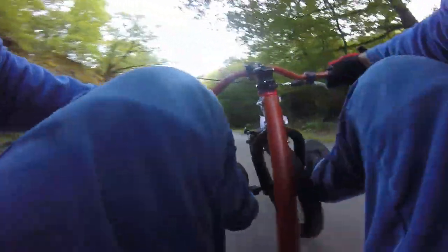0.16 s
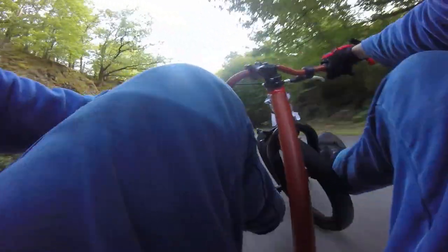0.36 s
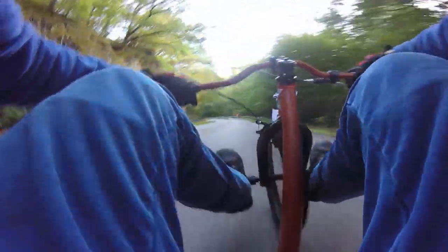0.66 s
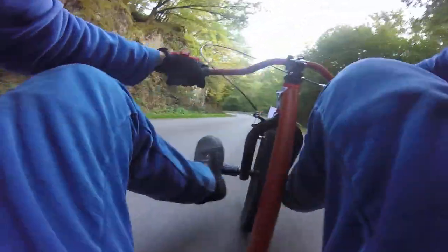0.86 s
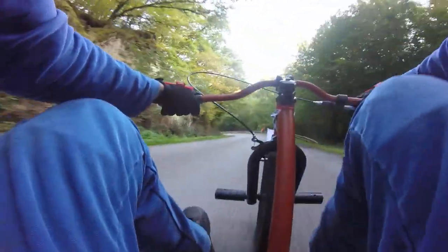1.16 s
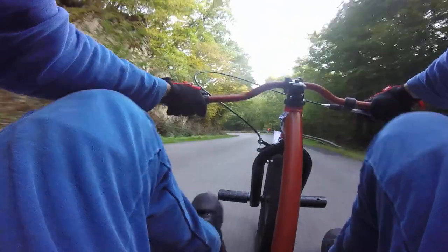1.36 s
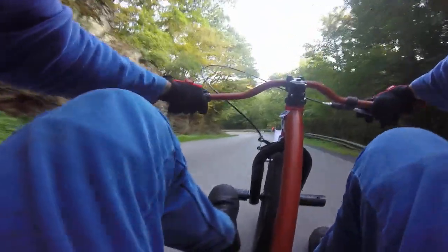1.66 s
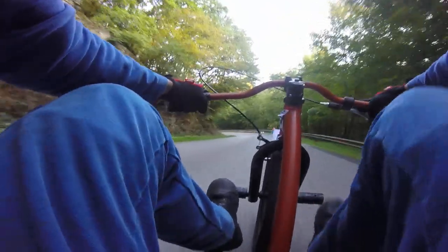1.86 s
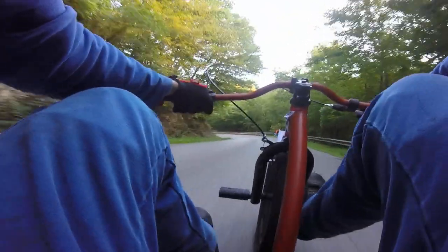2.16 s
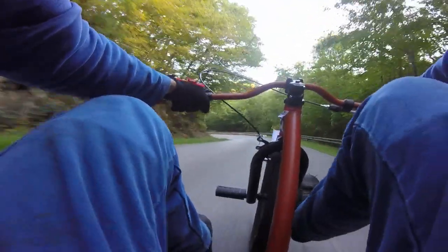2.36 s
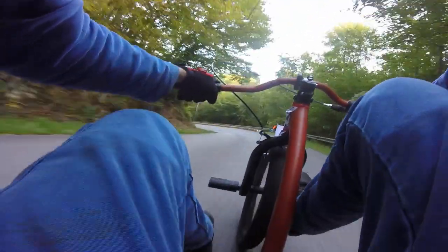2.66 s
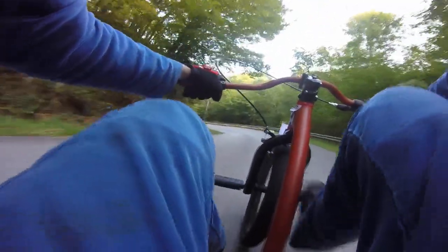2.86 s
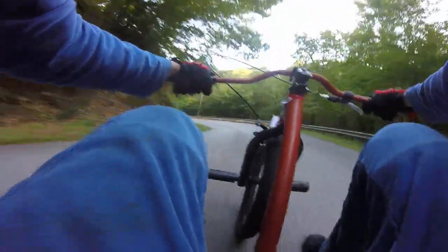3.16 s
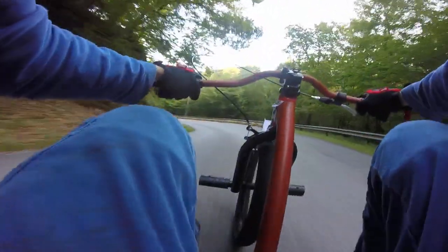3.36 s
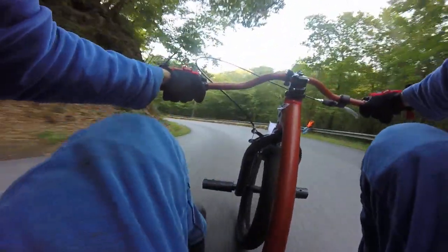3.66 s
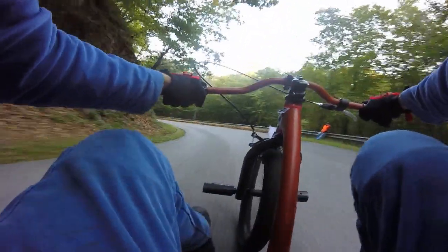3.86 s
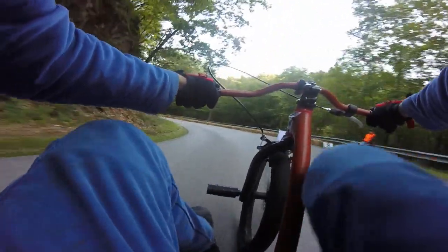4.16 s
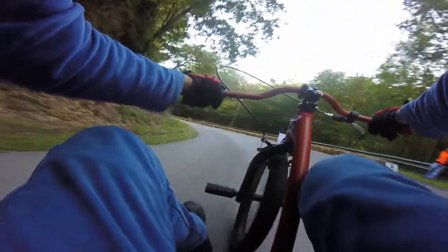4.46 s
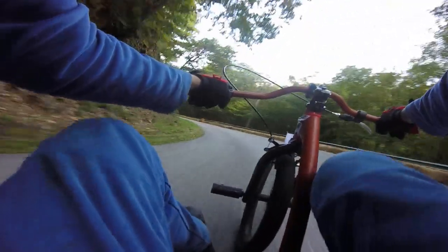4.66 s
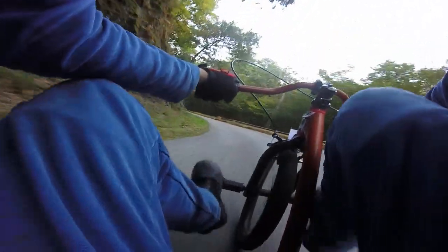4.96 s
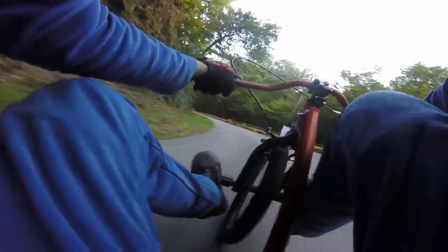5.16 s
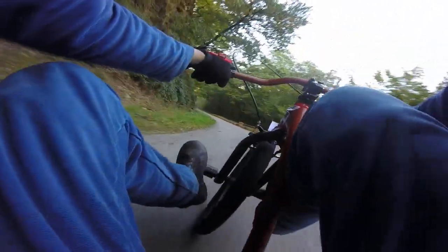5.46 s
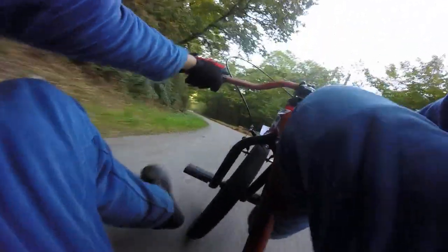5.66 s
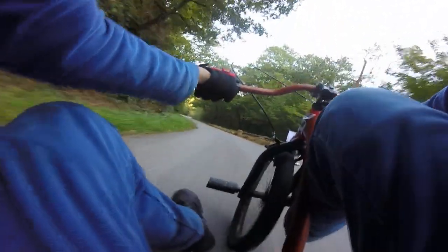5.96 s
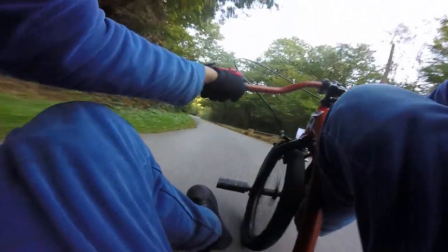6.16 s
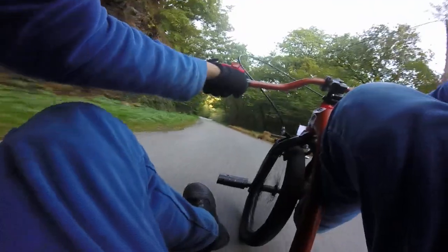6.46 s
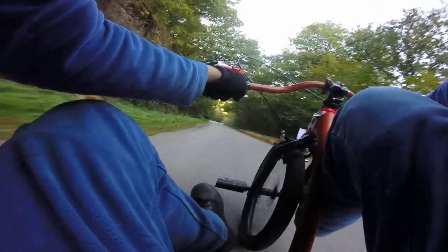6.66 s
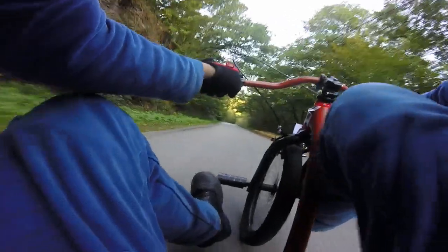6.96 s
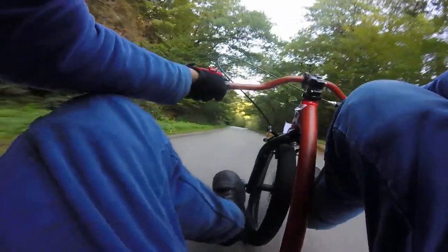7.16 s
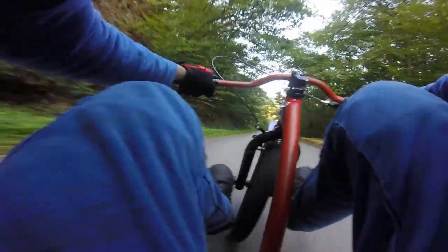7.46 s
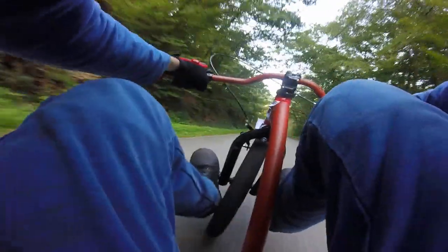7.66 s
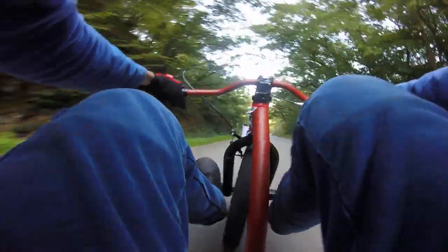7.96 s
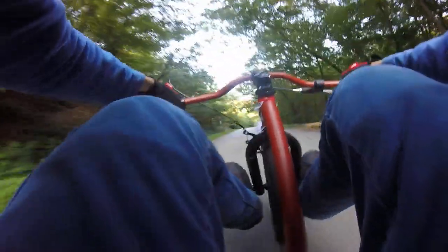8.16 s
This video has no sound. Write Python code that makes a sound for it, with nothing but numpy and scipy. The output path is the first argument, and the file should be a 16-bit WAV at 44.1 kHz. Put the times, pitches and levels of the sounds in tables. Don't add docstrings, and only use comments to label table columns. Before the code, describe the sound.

A low trike speeds down asphalt with a steady, throbbing mid-pitched wheel whine, stones knocking and grit ticking as wind rumbles in the microphone.

```python
import sys
import numpy as np
from scipy import signal
from scipy.fft import rfft, irfft, next_fast_len
from scipy.io import wavfile

SR = 44100
rng = np.random.default_rng(int(sys.argv[2]) if len(sys.argv) > 2 else 0)


def field_ratio(decibels):
    return 10 ** (np.asarray(decibels, dtype=float) / 20)


def put_to_file(sound):
    columns = np.atleast_2d(sound).T
    safe = np.clip(columns, -1, 1)
    whole_steps = np.round(safe * 32767)
    wavfile.write(sys.argv[1], SR, whole_steps.astype(np.int16))


N = 366894
T = np.arange(N) / SR


def evened(x):
    return x / np.sqrt(np.mean(x ** 2) + 1e-20)


def curves(rows):
    s, *columns = np.transpose(rows)
    return [np.interp(T, s, column) for column in columns]


def add(mix, s, sound):
    part = mix[round(s * SR):][:len(sound)]
    part += sound[:len(part)]


def coloured(x, points):
    f, db = np.transpose(points)
    size = next_fast_len(len(x))
    hz = np.fft.rfftfreq(size, 1 / SR)
    gain = field_ratio(np.interp(np.log(hz + 1), np.log(f), db))
    return irfft(rfft(x, size) * gain, size)[:len(x)]


def wander(top_hz):
    return evened(coloured(rng.standard_normal(N), [(1, -20), (top_hz / 8, 0), (top_hz, -6), (4 * top_hz, -50)]))


def swell(start, length, rise, fall):
    return np.clip((T - start) / rise, 0, 1) * np.exp(-np.clip(T - start - length, 0, 3) / fall)


def resonate(x, hz, width):
    angle = (2 * np.pi * (np.cumsum(hz * np.ones(len(x))) / SR % 1)).astype(np.float32)
    turn = np.cos(angle) + 1j * np.sin(angle)
    r = np.exp(-np.pi * 1.5 * width / SR)
    smooth = signal.lfilter([(1 - r) ** 2], [1, -2 * r, r * r], x * turn.conj())
    return 2 * (turn * smooth).real


def body(x, modes, centre_hz=0, drift_db=1.5, drift_hz=25.):
    knots, rung = np.linspace(0, T[-1], 60), np.zeros(N)
    for k, (f, width, db) in enumerate(modes):
        strength, pitch = rng.standard_normal((2, len(knots)))
        gain = np.interp(T, knots, field_ratio(db + drift_db * strength))
        hz = np.interp(T, knots, f + drift_hz * pitch)
        rung += (-1) ** k * gain * resonate(x, centre_hz + hz, width)
    return evened(rung) * np.std(x)


def microphone_hiss():
    # (frequency [Hz], level [dB])
    hiss_colour = [(5000, -38), (10000, 1.5), (12000, -2.5), (13000, -10.5), (15000, -15)]
    return field_ratio(-80.0) * evened(coloured(rng.standard_normal(N), hiss_colour))


def gusts():
    # (start [s], length [s], moan level [dB], pitch [Hz])
    trains = [(0.263, 0.226, -26.5, 65.9), (0.528, 0.1054, -20.5, 69), (0.876, 0.12, -28.5, 56.9),
              (2.14, 0.136, -29.5, 55.5), (2.713, 0.029, -24.5, 61.65), (2.815, 0.058, -25.5, 63.5),
              (2.943, 0.098, -28, 61.5), (3.613, 0.326, -28, 58), (4.006, 0.035, -17, 64.6),
              (4.083, .12, -19.5, 66.95), (4.276, 0.357, -14, 67), (4.691, .13, -15.5, 65.7),
              (4.869, .15, -14.5, 63.26), (5.067, 0.097, -12, 63.08), (5.211, 0.298, -20, 68),
              (5.592, 0.13, -18.5, 61.75), (5.77, 0.21, -14.5, 58.15), (6.038, 0.056, -9, 62.14),
              (6.159, 0.1678, -10.5, 65), (6.422, 0.085, -13.5, 60), (6.54, 0.064, -14, 60),
              (6.663, .11, -23, 62.13), (6.799, 0.17, -10, 66.2), (7.04, 0.16, -14.5, 60),
              (7.269, 0.05, -19, 57.5), (7.616, 0.026, -20.5, 65.9), (7.701, 0.188, -20.5, 72),
              (8.182, .11, -22, 65)]
    lull_db, lull_hz = -38, 60
    power = field_ratio(2 * lull_db)
    weighted = power * lull_hz
    for s, length, db, hz in trains:
        train = (field_ratio(db) * swell(s, length, rise=0.01, fall=0.03166)) ** 2
        power = power + train
        weighted = weighted + train * hz
    return 10 * np.log10(power), weighted / power


def wind():
    # (time [s], rumble level [dB])
    air = [(0, -31.5), (.4, -33), (.8, -35.5), (1.15, -28), (1.55, -19.5), (1.8, -27), (2.1, -26),
           (2.7, -34), (3.2, -24.5), (3.45, -32), (4, -26.5), (4.5, -25.5), (5.5, -29), (5.65, -19),
           (6.3, -18.5), (7.3, -33.5), (7.65, -26), (8.32, -43)]
    # (frequency [Hz], level [dB])
    rumble_colour = [(4, -20.5), (14, 10.5), (22, 10.5), (40, 6.5), (55, 5), (80, -27), (150, -43)]
    roar_colour = [(40, -26), (90, 0.5), (135, -6.5), (170, -6), (260, -26), (500, -28.5), (1500, -76)]
    # (time [s], peak level [dB], pitch [Hz])
    knocks = [
        (3.162, -16.5, 161),
        (3.211, -17, 71),
        (6.256, -17, 221.3),
        (6.928, -20, 197),
    ]
    # (frequency [Hz], level [dB])
    port = [(300, -1.5), (1200, -1), (4000, -48), (15000, -90)]
    moan_db, moan_hz = gusts()
    rumble_db, = curves(air)
    roar_db = -35 + 0.18 * (moan_db + 21)
    turns = np.cumsum(moan_hz * (1 + 0.1333 * wander(top_hz=19.9))) / SR
    tone = np.cos(2 * np.pi * turns) + field_ratio(-12.5) * np.cos(4 * np.pi * turns + 0.9)
    fuzz = evened(resonate(rng.standard_normal(N), 1.182 * moan_hz, width=28.0))
    out = field_ratio(moan_db + 1.2 * wander(top_hz=25.2)) * evened(tone + field_ratio(-6.0) * fuzz)
    rumble = evened(coloured(rng.standard_normal(N), rumble_colour))
    out += field_ratio(rumble_db + 2.5 * wander(top_hz=14.0)) * rumble
    lumpy_air = rng.standard_normal(N) * field_ratio(2.5 * wander(top_hz=29.8))
    out += field_ratio(roar_db) * evened(coloured(lumpy_air, roar_colour))
    t = np.arange(1500) / SR
    for s, db, hz in knocks:
        envelope = (t / 0.0054) * np.exp(1 - t / 0.0057)
        add(out, s, field_ratio(db) * np.sin(2 * np.pi * hz * t) * envelope)
    limit = .62
    return coloured(limit * np.tanh(out / limit), port)


def squeaks():
    # (start [s], length [s], pitch [Hz], level [dB])
    rubs = [
        (1.194, .12, 10100, -63.5),
        (1.385, 0.07, 9900, -64),
        (2.133, 0.07, 9690, -64),
        (2.465, .065, 9600, -65),
    ]
    out = np.zeros(N)
    for s, length, hz, db in rubs:
        noise = rng.standard_normal(6000)[:int(length * SR)]
        whistle = evened(resonate(noise, hz, width=340.))
        add(out, s, field_ratio(db) * whistle * signal.windows.tukey(len(noise), .7))
    return out


def flecks():
    slot_s = .004
    slots = np.arange(0, T[-1], slot_s)
    chance, size, tint = rng.random((len(slots), 3)).T
    flecks_per_s = np.where((slots > 5.5) & (slots < 6.62), 40, 4)
    peak_db = -50.5 - 3.5 * np.log(size)
    top_db = -26 + 12 * (tint - .5)
    rows = np.transpose([slots, peak_db, top_db])
    return list(rows[chance < flecks_per_s * slot_s])


def grit():
    # (time [s], peak level [dB], brightest part over it [dB])
    large_flecks = [(0.745, -44, -50.5), (1.0151, -42, -36), (1.168, -40, -30), (1.316, -37.5, -32),
                    (1.402, -41, -30), (1.6844, -35.5, -29), (1.7394, -43, -32), (2.134, -40, -35),
                    (3.8342, -43, -18), (3.6644, -42.5, -22), (3.6853, -38.5, -14), (4.885, -41, -19),
                    (5.4504, -38.5, -23), (5.5653, -37, -19), (5.613, -36.5, -26), (5.657, -39.5, -22),
                    (5.7259, -38.5, -34), (5.829, -38, -18), (5.875, -40, -15), (5.889, -29, -23),
                    (5.969, -37, -15), (5.9887, -32, -22), (6.0387, -36, -23), (6.1589, -35, -21),
                    (6.202, -34, -26), (6.3145, -37, -25), (6.445, -36, -27), (6.5296, -38, -23),
                    (6.5434, -35.5, -26), (7.17, -39, -26)]
    low, middle, top = np.zeros((3, N))
    t = np.arange(1500) / SR
    for s, db, top_db in [*large_flecks, *flecks()]:
        scratch = rng.standard_normal(len(t)) * np.minimum(t / 0.00086, 1) * np.exp(-t / 0.0037)
        low_db = 2 - 0.2 * (db + 39)
        for part, part_db in (low, low_db), (middle, 0), (top, top_db):
            add(part, s, field_ratio(db + part_db) * scratch)
    low = coloured(low, [(1500, -33), (3600, 0), (5200, -4.5), (6300, -1.5), (7600, -20), (10000, -62)])
    middle = coloured(middle, [(4000, -46.0), (7000, 2.5), (8600, -3), (10500, -12.5), (12500, -36), (15000, -53)])
    top = coloured(top, [(8000, -42), (11500, 3.5), (13000, -8.0), (15000, -7.5)])
    return field_ratio(8.0) * low + field_ratio(5.5) * middle + field_ratio(12.0) * top


def road(stones_per_s, spread_db, stone_db):
    size = field_ratio(spread_db * np.minimum(rng.exponential(1, N), 5))
    size = size * (rng.random(N) < stones_per_s / SR)
    stones = evened(size * rng.choice([-1., 1.], N))
    return evened(rng.standard_normal(N) + field_ratio(stone_db) * stones)


def stone_blows():
    # (time [s], peak level [dB])
    large_stones = [(0.7487, -22.5), (0.862, -23), (1.544, -10), (1.684, -13), (1.7385, -19.5), (1.79, -18),
                    (1.9371, -18.5), (2.1682, -33), (2.4, -15.5), (2.4581, -20), (2.553, -18),
                    (2.6538, -13), (3.018, -23), (3.209, -18), (3.685, -21), (4.495, -20), (5.5655, -16),
                    (5.6144, -10), (5.6602, -18.5), (5.7503, -31), (5.968, -6), (6.151, -16.5),
                    (6.4313, -20), (6.4748, -10), (6.6498, -14), (6.7906, -11), (7.797, -22), (7.9197, -15),
                    (8.0429, -25), (8.1782, -14)]
    blows, t = np.zeros(N), np.arange(900) / SR
    for s, db in large_stones:
        add(blows, s, field_ratio(db + 21.0) * np.minimum(t / 0.0005, 1) * np.exp(-t / 0.0025))
    return blows


def seam_jolts():
    # (time [s], wheel change [dB], frame change [dB])
    seams = [(0, 0, -1.5), (.76, -2, 6), (2.12, 1, 6), (3.13, 3.5, -1.5), (3.25, 4, -0.5), (3.65, 2, 3.5),
             (4.18, 2.5, -1.5), (4.66, 2.5, 5), (5.33, 3.5, -2), (6.61, 2.5, -1), (7.19, 2, 1.5),
             (8.17, 0.5, 3.5)]
    return sum(np.outer(db, swell(s, 0.027, rise=0.0096, fall=.03)) for s, *db in seams)


def skidding():
    # (start [s], length [s], fizz level [dB])
    slides = [
        (1.198, 0.36, -70),
        (1.498, .24, -71),
        (3.095, 0.47, -63.5),
        (3.608, 0.35, -67),
        (4.4, 1, -74),
        (5.898, .9, -74),
        (7.05, 0.29, -66.5),
    ]
    return sum(field_ratio(db) * swell(s, length, rise=0.11, fall=.08) for s, length, db in slides)


def rolling():
    # (time [s], speed [turns per s])
    wheel_speed = [(0, 11.8), (.6, 12), (1.1, 13.15), (2.6, 12.9), (3.4, 12.6), (4.4, 11.2), (5.7, 11.9),
                   (6.2, 12.7), (7.6, 12.6), (8.32, 11.9)]
    # (time [s], tread force [dB], side load of the drift [dB])
    tread_load = [(0, -24.5, -2), (.35, -31.5, 5), (.7, -30, 0.5), (.78, -26, -1.5), (1.74, -28.5, 2.5),
                  (1.95, -30.5, 0), (2.8, -28.5, -3), (2.9, -26.5, 3), (3.3, -25.5, 1), (3.9, -27.5, 3),
                  (4.25, -29.5, 4.5), (5.05, -24, 1.5), (5.55, -27.5, 1), (6.1, -23.5, 0.5), (6.8, -26, 3),
                  (7.6, -29, 3), (8.1, -28, -2), (8.32, -29.5, 2.5)]
    # (offset [Hz], width [Hz], level [dB])
    whine_modes = [(-35, 103, 13.5), (81.5, 74, 6), (278, 233, 0.5), (-220, 330, -24)]
    # (frequency [Hz], width [Hz], level [dB])
    shell_modes = [(2233, 155, 3.5), (2400, 530, -16.5), (2705, 187, 2), (3077, 106, -11.5),
                   (3420, 320, -12), (3930, 245, -14), (4400, 1050, -18.5), (5100, 250, -29)]
    rasp_modes = [(5010, 270, 1), (6170, 620, 9.5), (7110, 340, 7), (7800, 1160, 2), (8900, 460, -23)]
    fizz_modes = [(9500, 2700, 19.5), (10450, 900, -1.5), (11700, 550, -5), (13600, 1200, -13),
                  (14700, 1000, -13)]
    frame_modes = [(360, 52, 9), (346, 20, -21.5), (503, 100, 1.5), (776, 170, -24)]
    skid_modes = [(9200, 2200, 1), (11700, 700, -3.5), (12600, 900, -10)]
    # (frequency [Hz], level [dB])
    muffle_low = [(4500, 0), (7000, -45.5), (15000, -44)]
    muffle_high = [(8600, -2.5), (11000, -11.5), (15000, -28)]

    speed, = curves(wheel_speed)
    force_db, side_db = curves(tread_load)
    turns = 0.28 + np.cumsum(speed) / SR
    whine_hz = 1497.3 + 6.3 * (speed - 12.3) - 3.9 * T

    def layer_gain(db, force_share, side_share):
        return field_ratio(db + force_share * (force_db + 27) + side_share * side_db)

    skid = skidding()
    rasp_gain = np.hypot(layer_gain(-51, .8, 0.54), field_ratio(12) * skid)
    skid_db = 20 * np.log10(skid + 1e-9)
    whine_hz = whine_hz + 2 * np.maximum(skid_db + 71.5, 0)
    wheel_db, frame_db = seam_jolts()
    out_of_round = 1.75 * np.cos(2 * np.pi * turns) + 0.89 * np.cos(2 * np.pi * (3 * turns + 0.96))
    bumps, chatter = wander(top_hz=25.3), wander(top_hz=90.)
    rattle = field_ratio(0.86 * wander(top_hz=60.))
    contact = road(stones_per_s=1500., spread_db=4.63, stone_db=-6.0)
    blows = stone_blows() * contact

    def load(throb, bump_db, chatter_db):
        return contact * evened(field_ratio(throb * out_of_round + bump_db * bumps + chatter_db * chatter))

    low = field_ratio(force_db + wheel_db + 0.4 * wander(top_hz=2.8)) * load(0.69, 0.33, 0.24)
    low += field_ratio(-23.5) * blows
    upper = layer_gain(-33.5, 1.04, 0.87) * field_ratio(0.96 * wander(top_hz=13.0)) * load(0.7, 0.9, 1.0)
    upper += field_ratio(-33.5) * blows
    rasp = rasp_gain * load(0.13, 0.72, 1.44) * rattle
    fizz = 0.74 * load(0.92, 1.0, 1.1) + 0.7 * rng.standard_normal(N)
    fizz = field_ratio(3.0) * layer_gain(-72.5, .6, 0.56) * fizz * field_ratio(1.1 * wander(top_hz=40.))
    skid_hiss = field_ratio(1.0) * skid * rng.standard_normal(N)
    drone = layer_gain(-35, 0.82, 0.53) * field_ratio(frame_db + 1.25 * wander(top_hz=3.3)) * load(0.16, 0.79, 1.0)

    structure = body(drone, frame_modes, drift_db=1.1, drift_hz=7.)
    structure += body(low, whine_modes, whine_hz, drift_db=1.27, drift_hz=9.6)
    structure += body(upper, shell_modes, drift_db=0.84, drift_hz=20.5)
    rasping = body(rasp, rasp_modes, drift_db=1.5, drift_hz=40.)
    out = coloured(structure, muffle_low) + coloured(rasping, muffle_high)
    return out + body(fizz, fizz_modes) + body(skid_hiss, skid_modes)


def scene():
    return (microphone_hiss() + wind() + squeaks() + grit() + rolling())[None]


def top_cut(x):
    return signal.sosfilt(signal.butter(12, 15150, fs=SR, output="sos"), x)


def record(dry):
    return top_cut(dry)


dry = scene()
out = record(dry)
put_to_file(out)
```